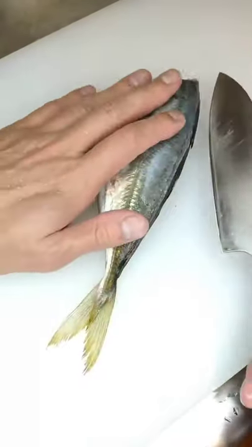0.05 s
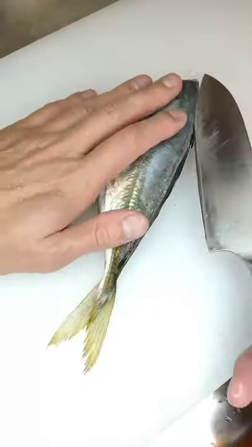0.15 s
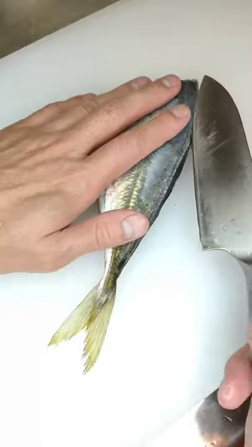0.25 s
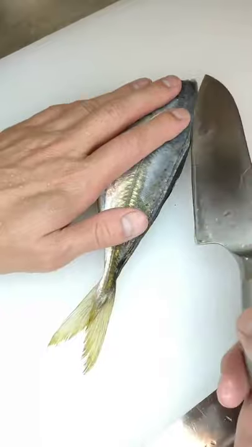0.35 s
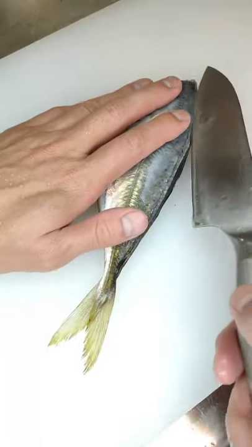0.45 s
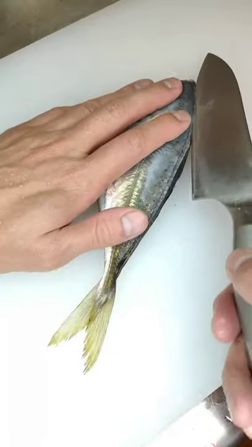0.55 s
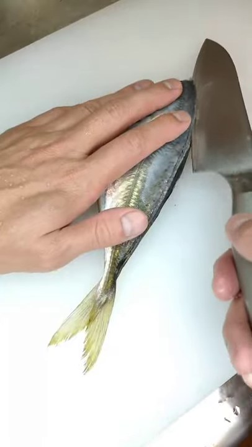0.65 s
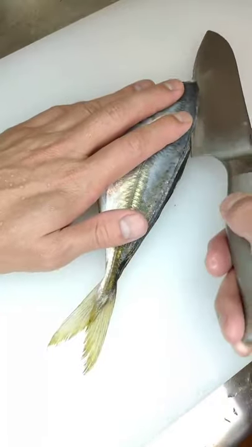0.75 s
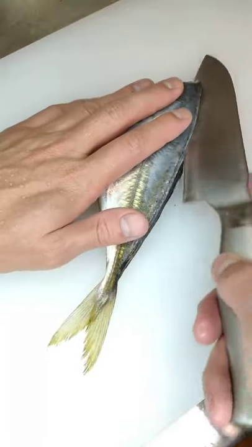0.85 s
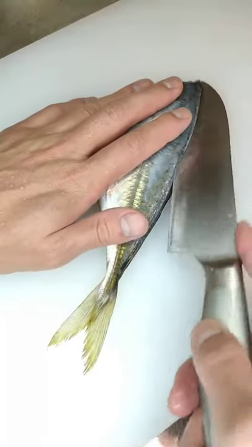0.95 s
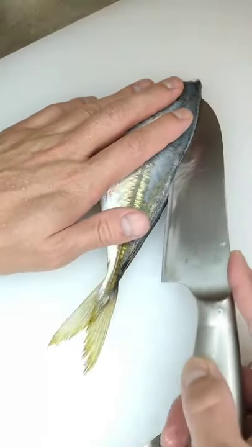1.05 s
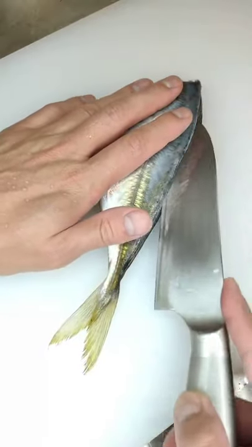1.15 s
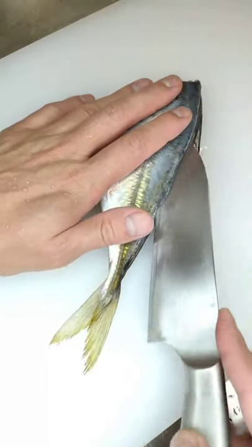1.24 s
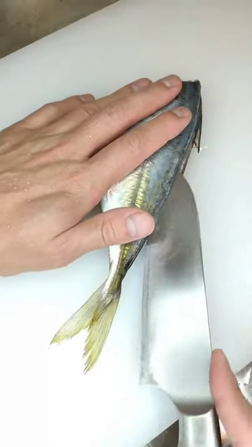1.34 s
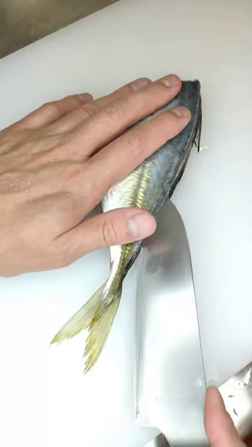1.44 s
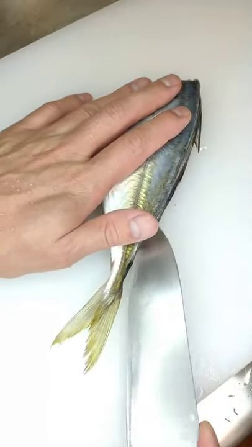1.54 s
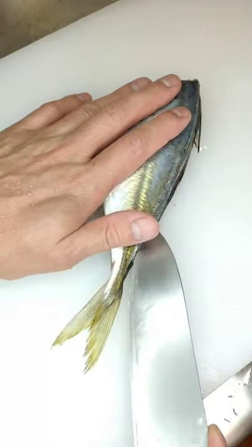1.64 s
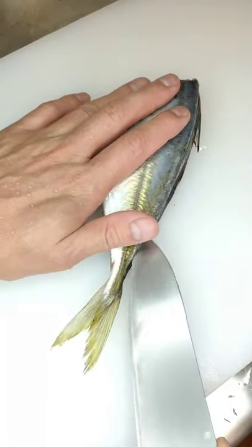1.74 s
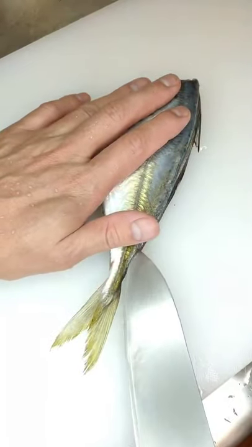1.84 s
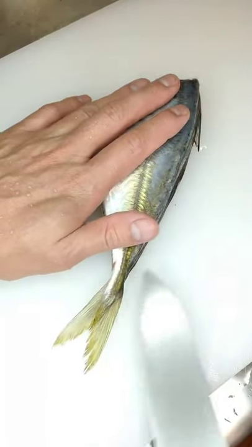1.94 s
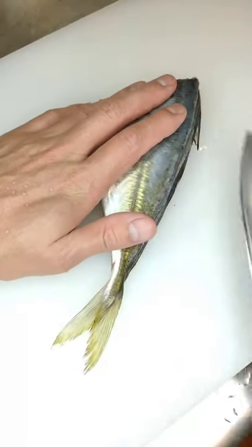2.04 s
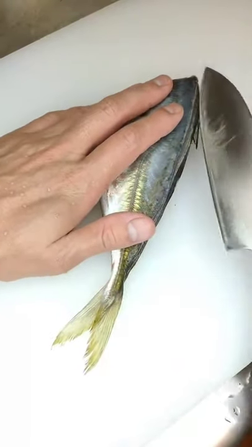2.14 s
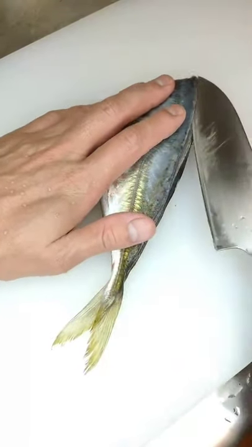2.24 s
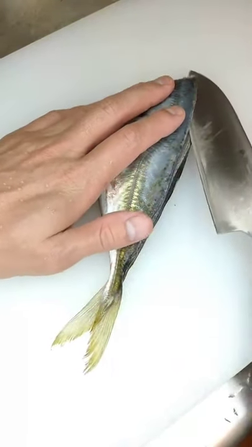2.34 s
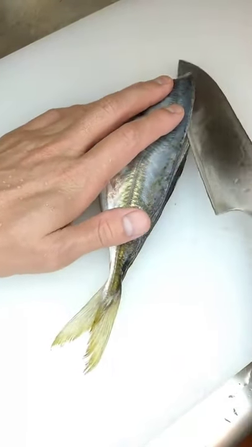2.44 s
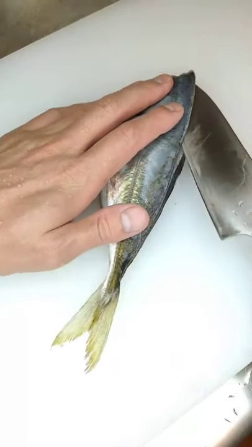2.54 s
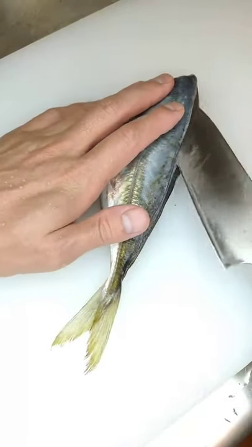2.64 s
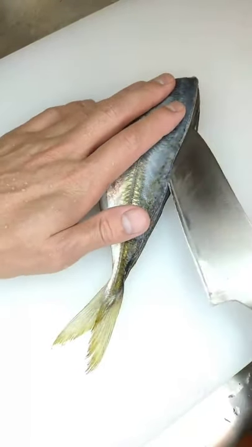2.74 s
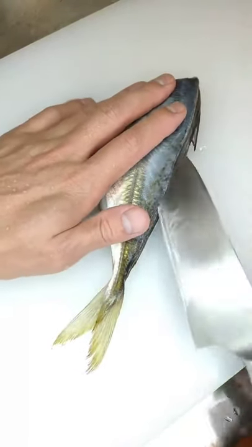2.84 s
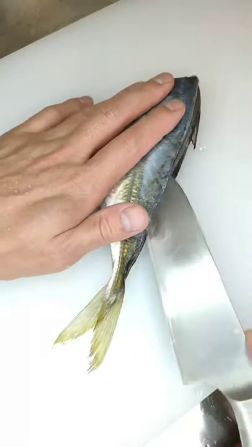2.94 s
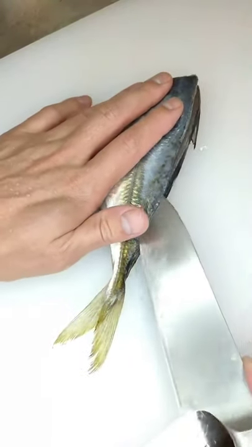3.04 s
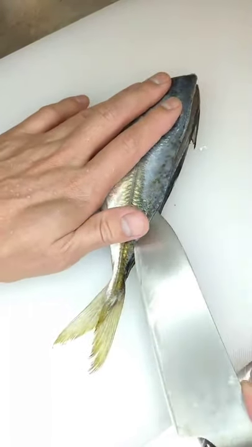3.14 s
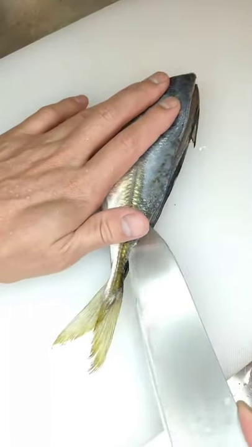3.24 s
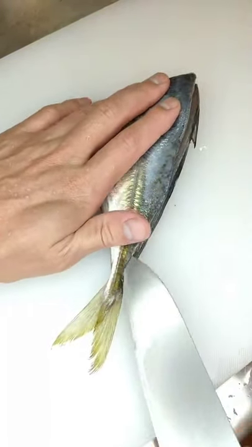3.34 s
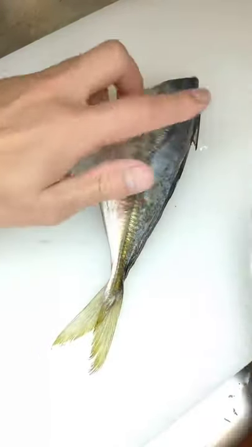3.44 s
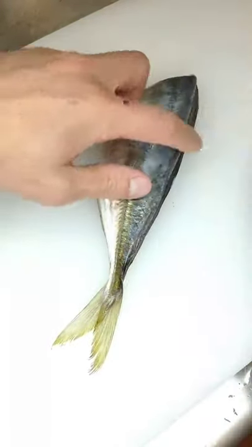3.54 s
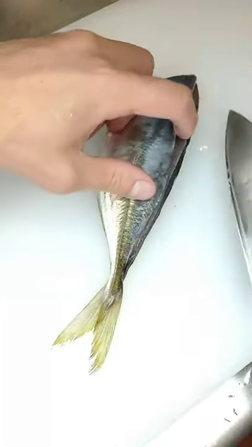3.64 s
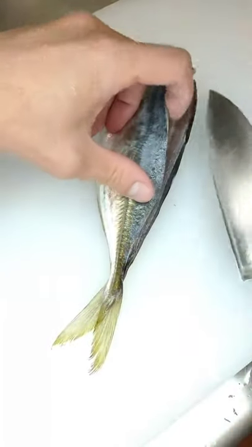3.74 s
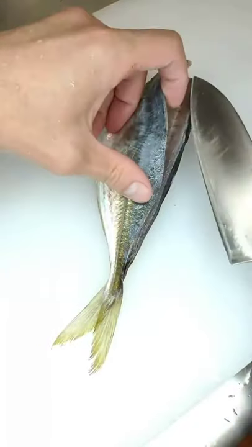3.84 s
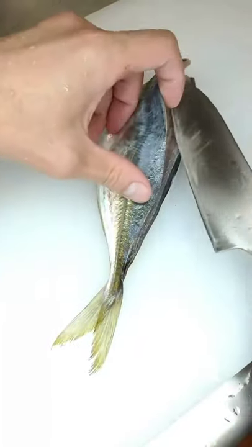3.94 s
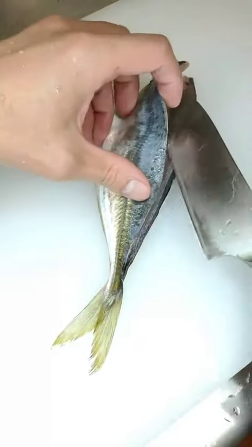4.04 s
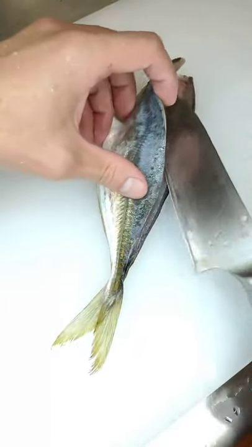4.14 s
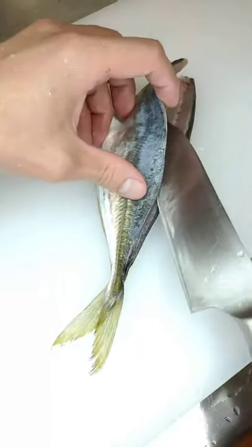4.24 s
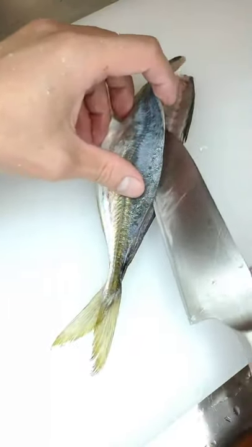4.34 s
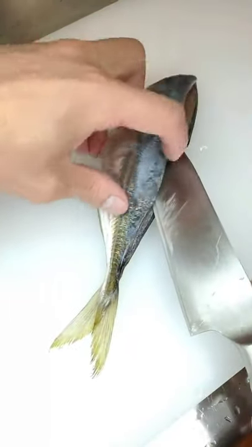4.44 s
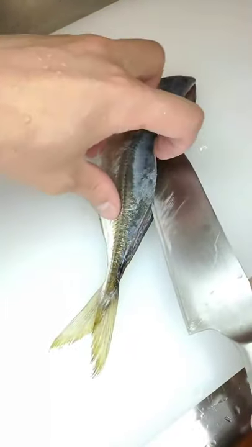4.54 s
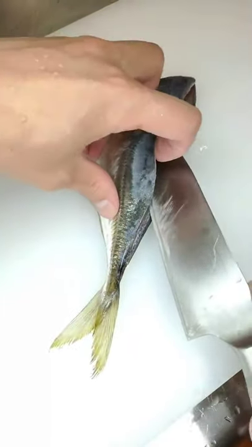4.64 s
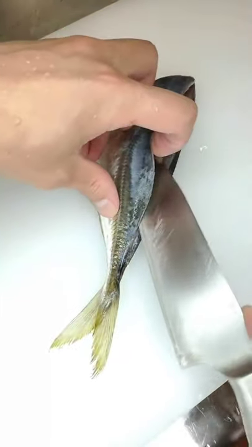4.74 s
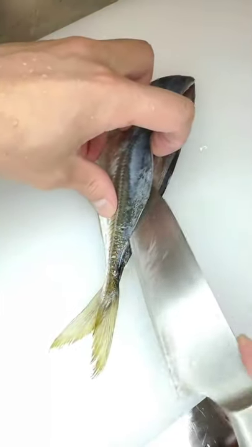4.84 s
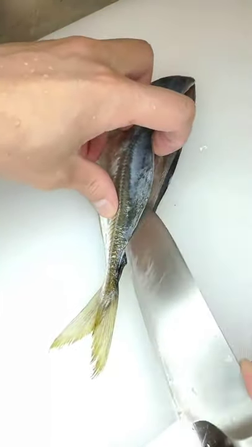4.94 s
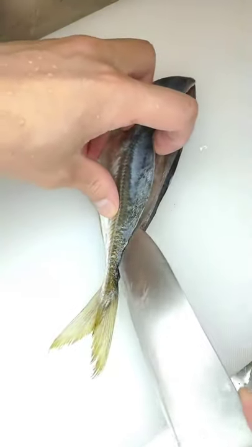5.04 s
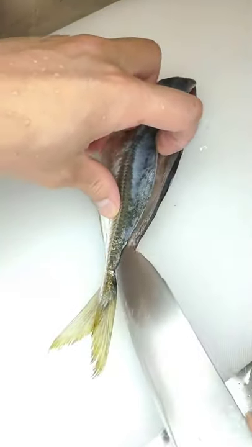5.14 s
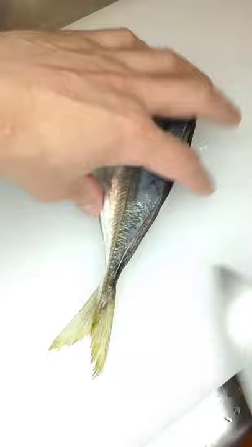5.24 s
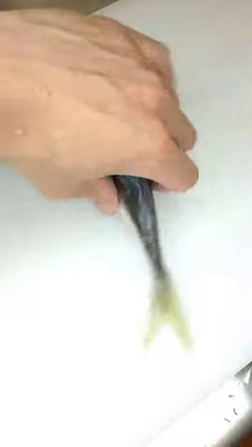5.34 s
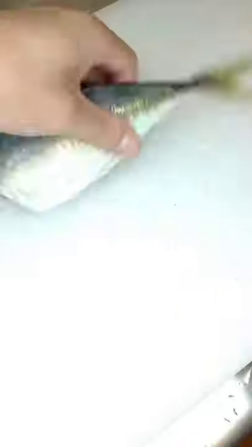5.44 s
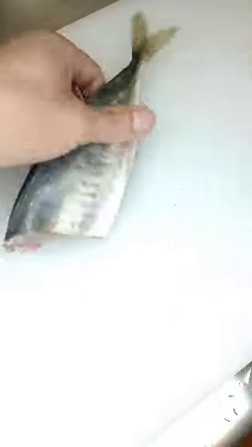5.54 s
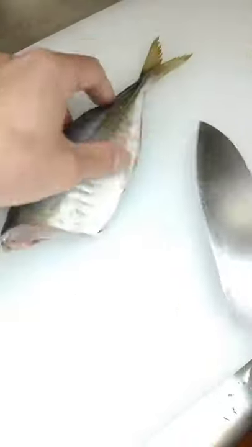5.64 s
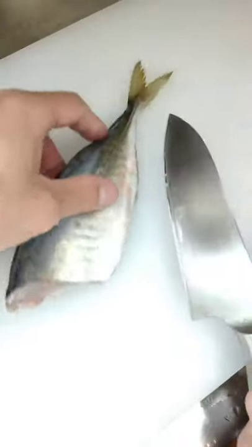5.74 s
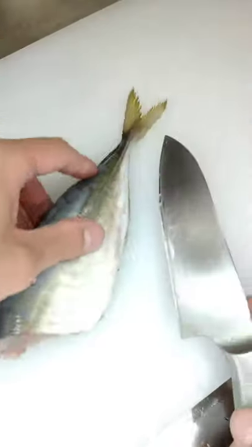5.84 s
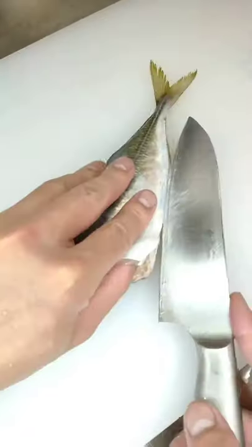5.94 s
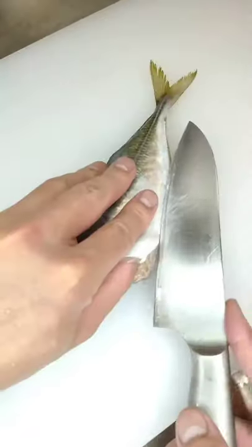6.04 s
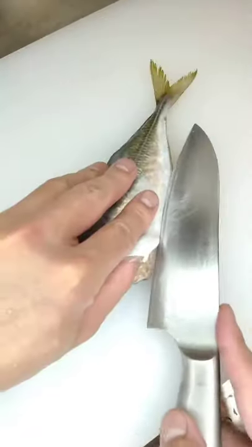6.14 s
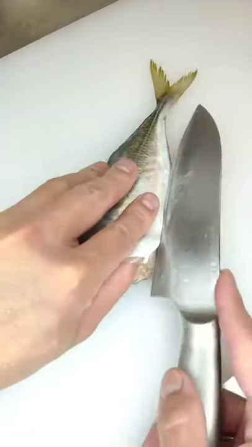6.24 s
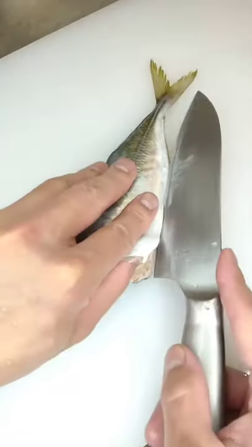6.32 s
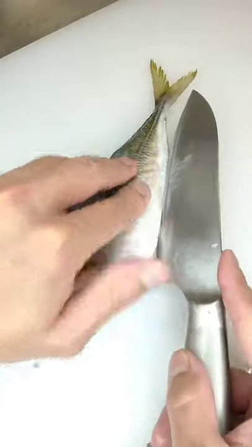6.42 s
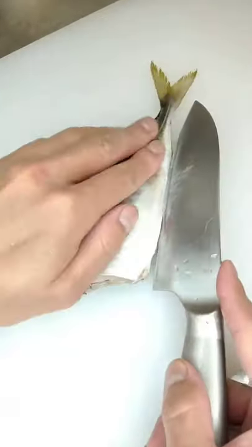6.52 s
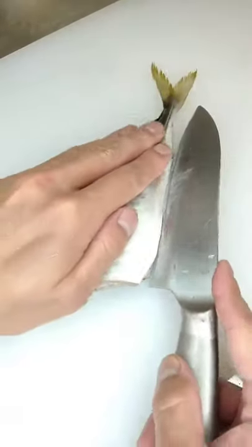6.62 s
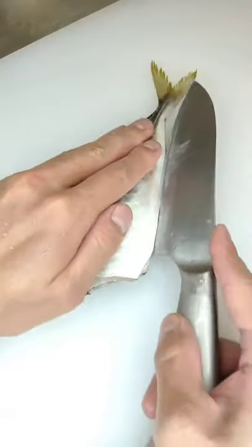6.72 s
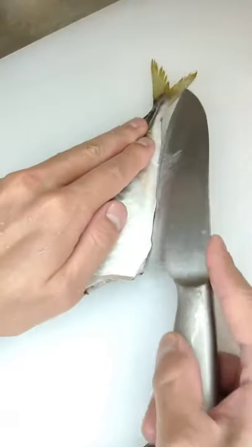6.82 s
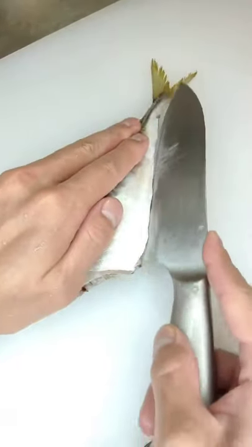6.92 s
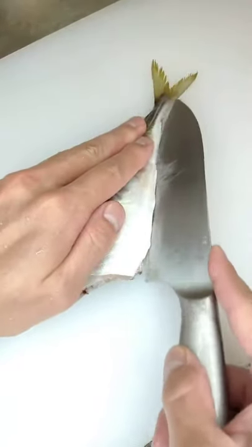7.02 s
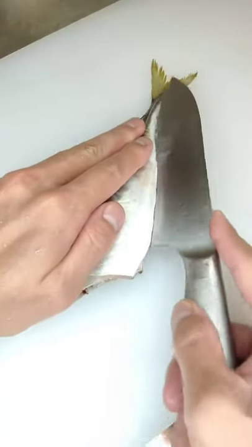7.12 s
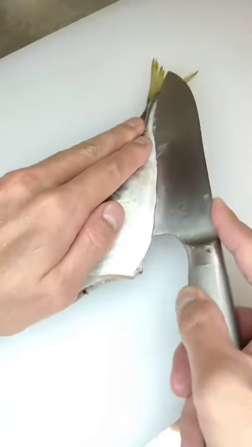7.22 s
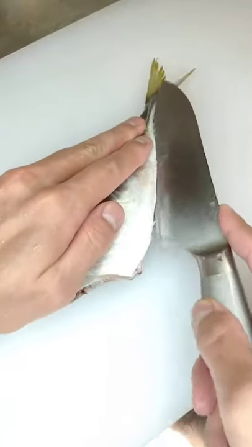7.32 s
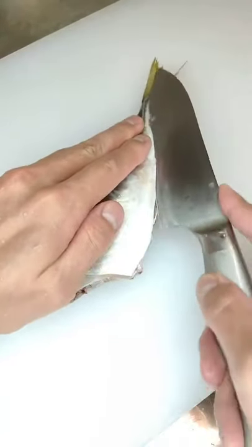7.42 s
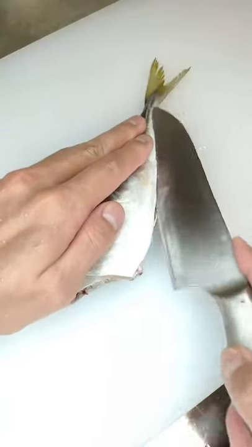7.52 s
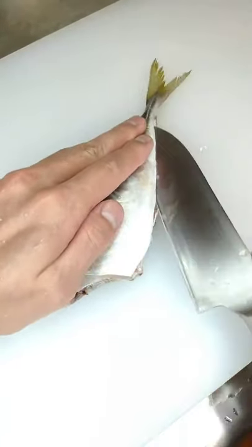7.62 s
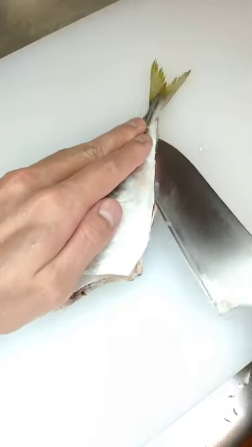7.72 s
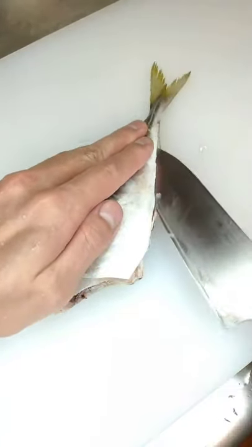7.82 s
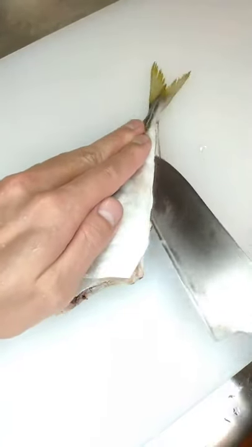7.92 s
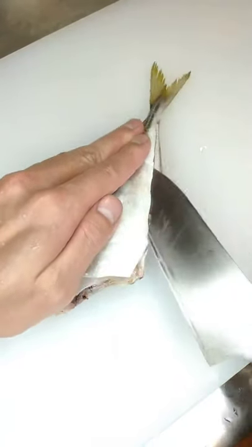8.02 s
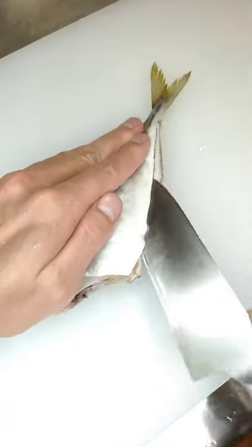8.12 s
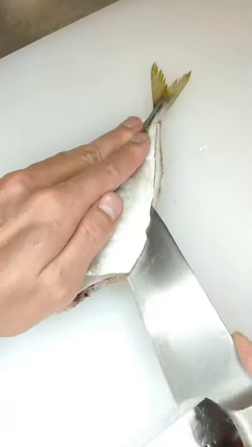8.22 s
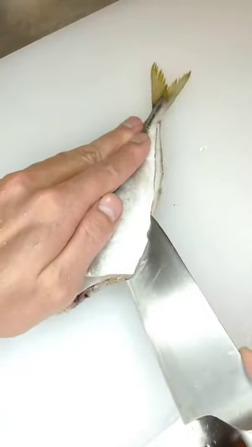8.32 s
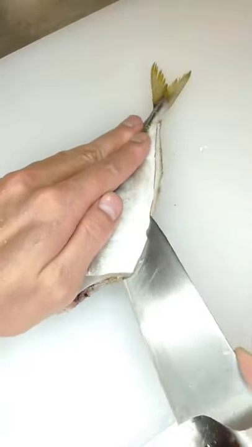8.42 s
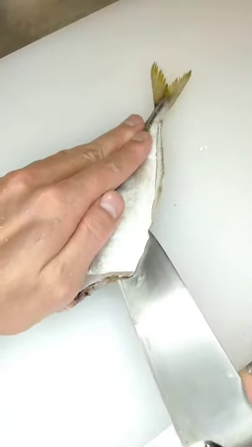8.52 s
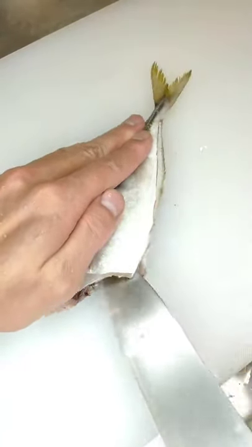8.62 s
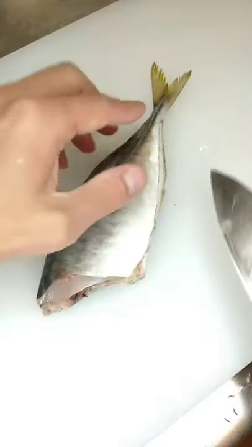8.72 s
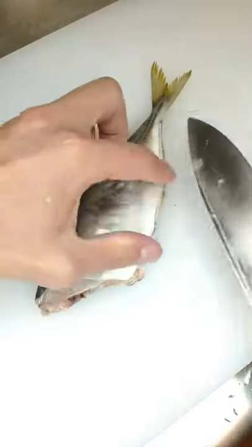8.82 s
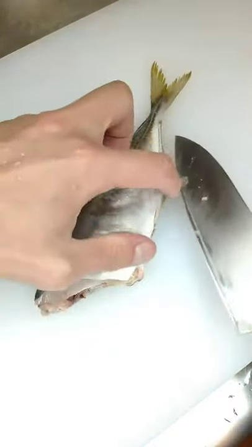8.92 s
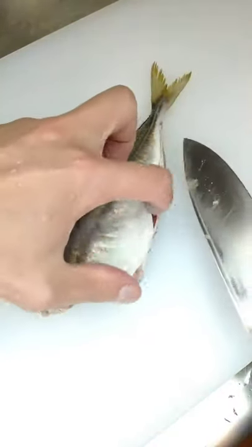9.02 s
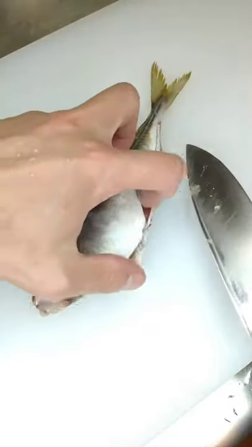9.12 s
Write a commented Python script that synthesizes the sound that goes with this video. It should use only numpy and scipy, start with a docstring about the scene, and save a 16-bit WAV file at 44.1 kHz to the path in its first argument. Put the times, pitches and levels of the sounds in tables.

```python
"""A humming kitchen: close up, a steel chef's knife fillets a fish on a plastic board.
The edge saws along the spine with a short steel ring (rubbing noise through blade resonances), snaps small
bones (noise bursts) and slips out ringing (decaying partials). The fish is flipped, slapped down and slid into
place (soft bursts, gliding resonances), then the belly skin is cut (coarse grains). The board thuds under hand
and blade (swelling low sines); ventilation and a refrigerator stay behind (shaped noise, two low tones)."""
import sys
import numpy as np
from scipy import signal
from scipy.fft import rfft, irfft, next_fast_len
from scipy.io import wavfile
from scipy.ndimage import uniform_filter1d, map_coordinates

SR = 44100
rng = np.random.default_rng(int(sys.argv[2]) if len(sys.argv) > 2 else 0)


def wrap_up_sound(samples):
    """Save the sound to the file named by the first command line argument, as 16-bit audio."""
    columns = np.atleast_2d(samples).T
    # keep every value between -1 and 1, then stretch to whole-number steps
    tamed = np.clip(columns, -1, 1)
    steps = np.round(tamed * 32767).astype(np.int16)
    wavfile.write(sys.argv[1], SR, steps)


N = 404397
TIME = np.arange(N) / SR
STROKE = SR * 4 // 5  # samples set aside for one stroke


def amp(db):
    """Decibels to gain."""
    return 10 ** (np.asarray(db) / 20)


def unit(x):
    """Scale to rms 1."""
    return x / np.sqrt(np.mean(np.abs(x) ** 2) + 1e-20)


def unit_peak(x):
    """Scale to peak 1."""
    return x / np.abs(x).max()


def add(track, s, sound):
    """Mix a sound into the track at s seconds."""
    start = max(round(s * SR), 0)
    track[start:start + len(sound)] += sound[:max(N - start, 0)]


def wobble(rate, size=N):
    """A smooth random curve with rate knots a second."""
    knots = rng.standard_normal(int(size * rate / SR) + 4)
    return map_coordinates(knots, [np.arange(size) * rate / SR])


def filtered(x, response):
    """x through a response that is a function of frequency."""
    m = next_fast_len(len(x) + SR // 10)
    return irfft(rfft(x, m) * response(np.fft.rfftfreq(m, 1 / SR)), m)[:len(x)]


def colour(points):
    """The response through (Hz, dB) points on a log axis."""
    f, db = np.transpose(points)
    return lambda hz: amp(np.interp(np.log(hz + 1), np.log(f), db))


def resonances(modes):
    """The causal response of (Hz, width in Hz, dB) resonances."""
    return lambda hz: sum(amp(db) * 1j * hz * w / (c * c - hz * hz + 1j * hz * w) for c, w, db in modes)


def gripped(modes, shift):
    """Flesh loads the blade anew at every contact: its resonances shift a little and trade strength."""
    return resonances([(hz * np.exp(shift * rng.standard_normal()), w, db + 1.3 * rng.standard_normal())
                       for hz, w, db in modes])


def tilted(x, tilt_db):
    """Brighten or dull by so many dB per octave above 1 kHz, keeping rms 1."""
    return unit(filtered(x, lambda hz: amp(tilt_db * np.log2(np.maximum(hz, 1000) / 4000))))


def friction(size, rate, spread_db, smooth):
    """Stick and slip: tiny catches of uneven size, rate a second, on a bed of smooth rubbing."""
    sizes = amp(spread_db * np.minimum(rng.exponential(size=size), 3)) * rng.choice([-1, 1], size)
    catches = unit(sizes * (rng.random(size) < rate / SR))
    return unit(catches + smooth * rng.standard_normal(size))


def stroke(length, rise_share, fullness):
    """Speed of one stroke: up to its crest, then easing away."""
    t = np.arange(STROKE) / SR
    rise = length * np.clip(rise_share, .05, .9)
    up = np.sin(np.pi / 2 * np.minimum(t / rise, 1)) ** fullness
    return up * np.exp(-2 * (np.maximum(t - rise, 0) / (length - rise)) ** 3)


def burst(spectrum, t60, rise_s):
    """A short coloured puff of peak 1."""
    t = np.arange(SR // 10) / SR
    puff = filtered(rng.standard_normal(len(t)), colour(spectrum))
    return unit_peak(puff * amp(-60 * t / t60) * (1 - np.exp(-t / rise_s)))


def ringing(modes, t):
    """Decaying (Hz, dB, t60) partials from t = 0 on, scaled to peak 1."""
    return unit_peak(sum(amp(db - 60 * t / t60) * np.sin(2 * np.pi * (hz * t + rng.random()))
                         for hz, db, t60 in modes))


def wandering(x, patchy_db):
    """The contact travels along the edge, so the colour keeps shifting."""
    z = signal.stft(x, nperseg=512)[2]
    patches = uniform_filter1d(rng.standard_normal(z.shape), size=7, axis=0)
    patches = uniform_filter1d(patches, size=9, axis=1)
    return signal.istft(z * amp(patchy_db * unit(patches)), nperseg=512)[1][:N]


# colour of the board's dull rumble: (frequency [Hz], relative level [dB])
BOARD = [(30, -16), (70, 6.5), (150, 1.5), (255, -3.5), (320, -12), (650, -22.5), (12000, -57)]


def rumble(speed):
    """The board's dull answer to a dragging edge."""
    return speed * unit(filtered(rng.standard_normal(len(speed)), colour(BOARD)))


DRAG_DB, DRAG_TOP_DB = 6.5, -29.5  # rumble over the edge's level, and the most that it reaches


def drag(db, speed):
    """The board rumbles with the force on the edge, up to a limit."""
    return amp(np.minimum(db + DRAG_DB, DRAG_TOP_DB)) * rumble(speed)


# colour of the ventilation: (frequency [Hz], relative level [dB])
AIR = [(20, -39), (45, -10), (100, -11.5), (170, -22), (350, -23.5), (600, -29), (2400, -41), (4600, -41),
       (5600, -47), (15500, -48.5)]
# hum of the refrigerator: (frequency [Hz], middle rms level [dB])
HUM = [(48.6, -41.5), (97.5, -39)]


def kitchen():
    """Ventilation rushes softly and evenly; a refrigerator hums, a little unsteady in level and phase."""
    air = amp(-39.0) * unit(filtered(rng.standard_normal(N), colour(AIR)))
    hum = sum(amp(db + 2.5 * wobble(3.7)) * np.sqrt(2) * np.sin(2 * np.pi * hz * TIME + 0.5 * wobble(12))
              for hz, db in HUM)
    return air + hum


# the blade glides flat over the board: (start [s], length [s], level [dB])
GLIDES = [(0.446, 0.46, -46.5), (6.158, 0.28, -46.5), (6.681, 0.28, -44.5)]
# modes of the blade lying flat: (frequency [Hz], relative level [dB])
FLAT = [(1810, 4), (3750, 3), (4310, 2.5), (5700, 1), (7950, 2.5), (11350, -3)]
# bright hiss of rubbing, shared by several contacts: (frequency [Hz], relative level [dB])
SCRAPE_HISS = [(700, -18), (4500, -2), (7000, -6), (11000, -2), (15500, -10.5)]
FLAT_WIDTH_HZ = 48
GLIDE_RISE, GLIDE_HISS_DB = 0.37, 1  # share spent speeding up; hiss over the whistle


def glides():
    """The flat blade catches on the board's grain, so its narrow modes whistle amid hiss."""
    out = np.zeros(N)
    for start, length, db in GLIDES:
        catches = friction(STROKE, rate=560, spread_db=7.5, smooth=0.57)
        whistle = unit(filtered(catches, resonances([(hz, FLAT_WIDTH_HZ, level) for hz, level in FLAT])))
        hiss = unit(filtered(catches[::-1], colour(SCRAPE_HISS)))  # reversed: unrelated to the whistle
        speed = stroke(length, GLIDE_RISE, fullness=1)
        add(out, start, amp(db) * speed * (whistle + amp(GLIDE_HISS_DB) * hiss))
    return wandering(out, patchy_db=2)


# short rubs in one resonant band, wet flesh sliding or the knife dragging on the board:
# (start [s], length [s], level [dB], centre [Hz], width [Hz])
RUBS = [(0.488, 0.23, -42.5, 1350, 900), (0.959, 0.51, -49, 7760, 1100), (5.372, 0.14, -38.5, 1820, 655),
        (5.696, 0.23, -37, 2300, 400), (7.425, 0.048, -37, 1170, 170)]
RUB_RISE = 0.56  # share of a rub spent speeding up
RUB_GLIDE = .25  # octaves that the resonance rises during a rub


def rubs():
    """A rub squelches or scuffs: crackle in one rising resonance, some fizz; the board rumbles."""
    out, index = np.zeros(N), np.arange(STROKE)
    for start, length, db, hz, width_hz in RUBS:
        speed = stroke(length, RUB_RISE, fullness=0.33)
        crackle = friction(STROKE, rate=500, spread_db=2.5, smooth=0.57)
        band = filtered(crackle, resonances([(hz, width_hz, 0)]))
        # play the band ever faster, so its pitch rises
        pitch = 2 ** (RUB_GLIDE * (np.minimum(index / SR / length, 1) - .5))
        band = unit(np.interp(np.cumsum(pitch), index, band))
        fizz = unit(filtered(crackle[::-1], colour(SCRAPE_HISS)))
        add(out, start, amp(db) * (speed * (band + amp(-3.5) * fizz) + amp(6.0) * rumble(speed)))
    return out


# the hand rocks the fish against the board: (start [s], length [s], level [dB])
PRESSES = [(0.631, 0.12, -26.5), (6.217, 0.3, -33), (6.675, 0.2, -25.5)]
PRESS_RISE = 0.3  # share of a press spent building up


def presses():
    """The fish rocking under the hand makes the board rumble dully."""
    out = np.zeros(N)
    for start, length, db in PRESSES:
        add(out, start, amp(db) * rumble(stroke(length, PRESS_RISE, fullness=0.64)))
    return out


# damp flesh, skin and steel slap the board:
# (time [s], smack peak [dB], clack peak [dB], frequency above which the smack is muffled [Hz])
SLAPS = [(.651, -26, -23, 1790), (1.6423, -23, -12.5, 6400), (1.715, -26.5, -19.5, 6000),
         (5.639, -14.5, -19, 6440), (5.6492, -10, -24, 7650), (6.452, -20, -45, 4480),
         (6.9941, -14.5, -20, 1700), (8.219, -7, -14, 6500), (8.646, -16, -19, 7000)]
CLACK_HZ, CLACK_T60_S = 244, 0.015  # short hollow answer of the board


def slaps():
    """Soft wet contacts: a smack, duller the more flesh cushions it, and the board's low clack."""
    out, t = np.zeros(N), np.arange(SR // 10) / SR
    for s, db, clack_db, hz in SLAPS:
        spectrum = [(hz / 10, -5), (hz, 0), (2 * hz, -16), (20 * hz, -65)]
        smack = burst(spectrum, t60=0.016, rise_s=0.00084)
        clack = unit_peak(np.sin(2 * np.pi * CLACK_HZ * t) * t * amp(-60 * t / CLACK_T60_S))
        add(out, s, amp(db) * smack + amp(clack_db) * clack)
    return out


# draws of the knife along the spine: (start [s], end [s], tip share at start [0-1], at end [0-1])
DRAWS = [(0.835, 1.61, 0, 0.96), (1.697, 2.006, 0.97, 0.6), (2.49, 3.188, 0.5, 0.99), (4.043, 5.25, 0, 0.9)]
TIP_POWER = 3.1  # the contact reaches the tip late in a draw


def tip_share(s):
    """In a draw the contact shifts along the edge, between its middle (0) and its tip (1)."""
    share = 0
    for start, end, first, last in DRAWS:
        progress = np.clip((s - start) / (end - start), 0, 1)
        share = np.where(s >= start, first + (last - first) * progress ** TIP_POWER, share)
    return np.clip(share, 0, 1)


# colour of tearing skin: (frequency [Hz], relative level [dB])
SKIN = [(350, 0), (850, -8.5), (1200, -2), (1600, -5.5), (2260, 2), (3200, -1.5), (4300, 0), (8480, -10),
        (11500, -8), (15500, -24)]
FIBRES_DB, BELLY_FIBRES_DB = -53.5, -50.5
BELLY_CUT_S = (7.35, 8.36)  # the edge stays in the belly from, until


def fibres():
    """Flesh keeps parting all through a draw: a sparse crackle, duller in the soft belly."""
    spine = sum((TIME > start) & (TIME < end) for start, end, _, _ in DRAWS)
    belly = (TIME > BELLY_CUT_S[0]) & (TIME < BELLY_CUT_S[1])
    crackle = friction(N, rate=200, spread_db=5, smooth=0.31)
    return (amp(FIBRES_DB) * spine * unit(filtered(crackle, colour(SCRAPE_HISS)))
            + amp(BELLY_FIBRES_DB) * belly * unit(filtered(crackle, colour(SKIN))))


# resonances of the blade held in flesh, near its middle: (frequency [Hz], width [Hz], relative level [dB])
BLADE = [(2038, 104, 7), (3815, 60, 8.5), (4070, 100, 1), (4810, 220, 4), (6197, 75, 2), (6450, 240, 4.5),
         (7590, 140, 1), (9120, 150, 0)]
# the same near its tip: (frequency [Hz], width [Hz], relative level [dB])
TIP = [(3030, 150, 5.8), (4260, 160, 9.5), (4846, 61, 11), (6160, 68, 7)]
MIDDLE_TILT_DB, TIP_TILT_DB = -2, 2  # per octave: the tip sounds brighter than the middle


def scraping(size, tip, tilt_db, smooth, chatter_db):
    """The edge chatters on bone; a blend of middle and tip resonances brightens towards the tip."""
    out = np.zeros(size)
    for modes, share, own_tilt_db in (BLADE, 1 - tip, MIDDLE_TILT_DB), (TIP, tip, TIP_TILT_DB):
        catches = friction(size, rate=1600, spread_db=5.0, smooth=smooth)
        steel = unit(filtered(catches, gripped(modes, shift=0.0048)))
        hiss = unit(filtered(catches[::-1], colour(SCRAPE_HISS)))
        out += np.sqrt(share) * tilted(steel + amp(-4) * hiss, own_tilt_db + tilt_db)
    return unit(out * amp(chatter_db * wobble(67.9, size)))


# force curve of the first long slice: (time [s], level [dB])
SLICE = [(0.84, -46), (1.038, -50), (1.552, -37.5), (1.59, -32), (1.624, -35.5), (1.63, -54)]
# the edge bumps over one vertebra after another: (start [s], length [s], level [dB])
VERTEBRAE = [(1.704, 0.11, -42.5), (1.794, 0.094, -38), (1.896, 0.05, -34), (1.949, 0.054, -32),
             (2.52, 0.042, -32.5), (2.624, 0.071, -40), (2.73, 0.067, -34.5), (2.824, 0.078, -37),
             (2.935, 0.063, -35), (3.032, 0.061, -35), (3.123, 0.046, -34), (3.223, 0.064, -35.5),
             (3.338, 0.083, -32.5), (4.073, 0.069, -40.5), (4.203, 0.13, -36.5), (4.69, 0.057, -36.5),
             (4.799, 0.058, -32.5), (4.907, 0.055, -33.5), (5.012, 0.071, -36), (5.079, 0.1, -40.5),
             (5.169, 0.11, -39)]
SLICE_TILT_DB, SLICE_FADE_S = 0, 0.011  # extra brightness per octave; the edge enters and leaves
BUMP_RISE = 0.26  # share of a bump spent speeding up
MIDDLE_DRAG_DB, TIP_DRAG_DB = -4, 6  # change to the rumble under a bump; what it gains at the tip


def scrapes():
    """One long slice opens the back; the later draws bump along the vertebrae."""
    out = np.zeros(N)
    times, levels = np.transpose(SLICE)
    t = np.arange(times[0], times[-1], 1 / SR)
    db = np.interp(t, times, levels)
    speed = np.clip(np.minimum(t - t[0], t[-1] - t) / SLICE_FADE_S, 0, 1)
    edge = scraping(len(t), tip_share(t), SLICE_TILT_DB, smooth=2.4, chatter_db=1.9)
    add(out, t[0], amp(db) * speed * edge + drag(db, speed))
    for start, length, db in VERTEBRAE:
        tip = tip_share(start)
        speed = stroke(length, BUMP_RISE, fullness=0.72)
        edge = scraping(STROKE, tip, tilt_db=rng.normal(-1, 1), smooth=0.56, chatter_db=2.5)
        board = amp(MIDDLE_DRAG_DB + TIP_DRAG_DB * tip) * drag(db, speed)
        add(out, start, amp(db) * speed * edge + board)
    return wandering(out, patchy_db=2.5)


# wet scales tick: (time [s], peak [dB])
TICKS = [(1.0596, -26), (3.114, -22), (3.499, -26), (4.1658, -20)]
# wet fingers shift their grip: (start [s], length [s], reference level, above the ticks themselves [dB])
GRIPS = [(2.286, 0.25, -21), (3.444, 0.56, -24), (4.333, 0.16, -21.5), (8.682, 0.53, -20)]
# colour of a wet tick: (frequency [Hz], relative level [dB])
WET = [(2500, -18), (9000, -11)]


def ticks():
    """Wet scales and fingers stick and let go: a few clear ticks, and faint clusters as the grip shifts."""
    out = np.zeros(N)
    clusters = []
    for start, length, db in GRIPS:
        for when, size in rng.random(size=(34, 2)):
            # the strongest stay 5.6 dB under the reference
            clusters.append((start + when * length, db - 11.2 * (1.5 - size ** 3)))
    for s, db in TICKS + clusters:
        add(out, s, amp(db) * burst(WET, t60=0.0076, rise_s=0.00022))
    return out


# thuds of the board: (time [s], level [dB], frequency [Hz])
THUDS = [(1.59, -8, 65), (1.642, -10, 78), (1.712, -13, 96), (1.809, -16, 67.7), (1.901, -18.5, 144),
         (1.951, -17.5, 150), (4.914, -17.5, 83), (5.304, -5.5, 71), (5.64, -0.5, 227), (5.642, -5, 76),
         (6.3, -18.5, 76.4), (6.378, -12.5, 163), (6.75, -12, 163), (6.778, -7, 104.5), (6.963, -8, 86),
         (6.987, -4, 120), (7.431, -17.5, 195), (8.01, -16, 134), (8.217, -7, 114.5), (8.631, -4.5, 62),
         (8.645, -12, 139)]
# the board's own ring under a thud: (frequency [Hz], relative level [dB], t60 [s])
PLATE = [(164.2, 0.5, 0.16), (241.8, -7.5, 0.16)]
PLATE_DB = -12.5  # relative to the thud's level
THUD_RISE_CYCLES = 0.83  # the swell crests within the first swing


def thuds():
    """Each push rocks the board for a cycle or two, rings it briefly and rattles it dully."""
    out, t = np.zeros(N), np.arange(SR // 4) / SR
    for s, db, hz in THUDS:
        u = t * hz / THUD_RISE_CYCLES
        swell = (u * np.exp(1 - u)) ** 1.43
        rocking = swell * np.sin(2 * np.pi * hz * t)
        ring = unit_peak(ringing(PLATE, t) * np.minimum(u, 1))
        add(out, s, amp(db) * (rocking + amp(PLATE_DB) * ring + amp(-13.5) * rumble(swell)))
    return out


# small bones snap against the edge: (time [s], level, 4.5 above the peak [dB])
BONES = [(1.8456, -14), (1.891, -14.5), (1.955, -12.5), (2.599, -20), (2.65, -7.5), (3.0574, -16.5),
         (3.129, -16.5), (3.2258, -14), (3.2383, -21), (4.268, -7.5), (4.713, 2), (4.7967, -12),
         (4.8291, -0.5), (5.019, -17), (7.187, -19), (7.7075, -11.5)]


def bones():
    """A bone crumbles within milliseconds, a louder one for longer, and jolts the damped blade."""
    out, t = np.zeros(N), np.arange(SR // 10) / SR
    for s, db in BONES:
        crumble_t60 = .03 * amp(.35 * db)
        crumble = rng.standard_normal(len(t)) * amp(-60 * t / crumble_t60)
        ring = unit_peak(filtered(crumble, resonances(BLADE)) * amp(-60 * t / 0.22))  # flesh mutes the steel
        snap = burst(SCRAPE_HISS, t60=crumble_t60, rise_s=0.00028)
        add(out, s, amp(db - 4.5) * unit_peak(ring + 0.76 * snap))
    return out


# the tip slips free and sings: (end of the swell [s], peak [dB], swell [s])
RELEASES = [(1.98, -19, .015), (5.246, -29, .03)]
# modes of the free blade: (frequency [Hz], relative level [dB], t60 [s])
FREE = [(2760, -0.5, 0.16), (3760, 0, 0.059), (5080, 6, 0.086), (8070, 1, 0.091)]


def free_blade():
    """Clear of the flesh the steel rings on: the last rub feeds each mode, then it dies away freely."""
    out, t = np.zeros(N), np.arange(SR // 2) / SR
    for s, db, swell in RELEASES:
        fed, free = np.minimum(t / swell, 1) ** 2, np.maximum(t - swell, 0)
        song = sum(amp(level - 60 * free / t60) * np.sin(2 * np.pi * hz * t + wobble(88, len(t)) / 2)
                   for hz, level, t60 in FREE)
        add(out, s - swell, amp(db) * unit_peak(fed * song))
    return out


GULP_S, GULP_LENGTH_S, GULP_DB = 5.323, 0.057, -25.5
GULP_LOW_HZ, GULP_OPEN_HZ, GULP_OPENING_S = 171, 645, .023  # pitch at first, when open; time to open
CUT_RISE = 0.28  # share of the gulp, and of a cut, spent speeding up


def gulp():
    """The wet pocket under the lifted fish opens: a rough tone sweeps upward while the film crackles."""
    out, t = np.zeros(N), np.arange(STROKE) / SR
    hz = GULP_LOW_HZ * (GULP_OPEN_HZ / GULP_LOW_HZ) ** np.minimum(t / GULP_OPENING_S, 1)
    pocket = np.sin(2 * np.pi * np.cumsum(hz) / SR + 2 * wobble(400, STROKE))
    film = filtered(friction(STROKE, rate=2200, spread_db=3, smooth=0.61), colour(SKIN))
    opening = stroke(GULP_LENGTH_S, CUT_RISE, fullness=1)
    add(out, GULP_S, amp(GULP_DB) * opening * (unit(pocket) + amp(-9) * unit(film)))
    return out


# the edge rasps through skin and scales: (start [s], length [s], level [dB])
CUTS = [(6.231, 0.054, -35), (6.306, 0.14, -40.5), (6.675, 0.13, -34), (6.842, 0.079, -31),
        (7.025, 0.075, -35.5), (7.114, 0.1, -38.5), (7.358, 0.059, -37), (7.479, 0.12, -35.5),
        (7.631, 0.067, -35), (7.747, 0.073, -36.5), (7.859, 0.1, -38.5), (7.983, 0.057, -35),
        (8.08, 0.052, -26.5), (8.142, 0.041, -28), (8.186, 0.071, -19.5), (8.242, 0.038, -28.5),
        (8.315, 0.055, -38.5), (8.489, 0.053, -29.5), (8.564, 0.027, -30), (8.604, 0.09, -29.5)]
CUT_TILT_DB, LIGHT_CUT_DB = -1.24, -41  # tilt per octave of a light cut; its level
DULLING = 0.14  # tilt lost per dB of extra force
BELLY_S, BELLY_DRAW_S = 6.76, 0.75  # the belly draw begins; its time to reach the tip
BRIGHTEN_DB = 2.5  # tilt per octave gained on the way


def cuts():
    """Skin and scales tear in coarse grains: duller in harder cuts, brighter as the draw nears the tip."""
    out = np.zeros(N)
    for start, length, db in CUTS:
        speed = stroke(length, CUT_RISE, fullness=0.74)
        tears = friction(STROKE, rate=2200, spread_db=3.5, smooth=0.72)
        tears = tears * amp(5.6 * np.tanh(wobble(131.6, STROKE)))
        steel = unit(filtered(tears[::-1], gripped(BLADE, shift=0.011)))
        rasp = unit(filtered(tears, colour(SKIN))) + amp(-6.5) * steel
        progress = np.clip((start - BELLY_S) / BELLY_DRAW_S, 0, 1)
        tilt_db = CUT_TILT_DB - DULLING * (db - LIGHT_CUT_DB) + BRIGHTEN_DB * progress
        add(out, start, amp(db) * speed * tilted(rasp, tilt_db) + drag(db, speed))
    return wandering(out, patchy_db=3.0)


# modes of the whole knife knocking on the board: (frequency [Hz], relative level [dB], t60 [s])
KNOCK = [(516, 8, 0.067), (1120, -3, 0.11), (1796, -3.5, 0.11), (2000, -6, 0.13), (2770, 0, 0.12),
         (3740, -1.5, 0.084)]


def knife_knock():
    """The last stroke ends with the knife knocking on the board: its modes ring and decay."""
    out, t = np.zeros(N), np.arange(SR // 2) / SR
    add(out, 8.652, amp(-10.5) * ringing(KNOCK, t) * np.minimum(t / 0.004, 1))
    return out


def walls(x, t60, dull_hz):
    """The short answer of a small room, which swallows the treble."""
    t = np.arange(SR // 2) / SR
    tail = rng.standard_normal(len(t)) * amp(-60 * t / t60) * (t > .005)
    echo = signal.fftconvolve(x, tail / np.linalg.norm(tail))[:N]
    return filtered(echo, lambda hz: 1 / (1 + 1j * hz / dull_hz))


def scene():
    """Knife, fish and board close by, the kitchen behind."""
    handling = glides() + rubs() + presses() + slaps() + ticks() + thuds() + gulp()
    cutting = fibres() + scrapes() + bones() + free_blade() + cuts() + knife_knock()
    work = handling + cutting
    return (work + amp(-19) * walls(work, t60=0.3, dull_hz=4030) + kitchen())[None]


TOP_HZ = 15550  # band limit


def record(dry):
    """Clip at full scale, then keep nothing above the band limit."""
    return filtered(np.clip(dry[0], -1, 1), lambda hz: hz < TOP_HZ)[None]


dry = scene()
out = record(dry)
wrap_up_sound(out)
```